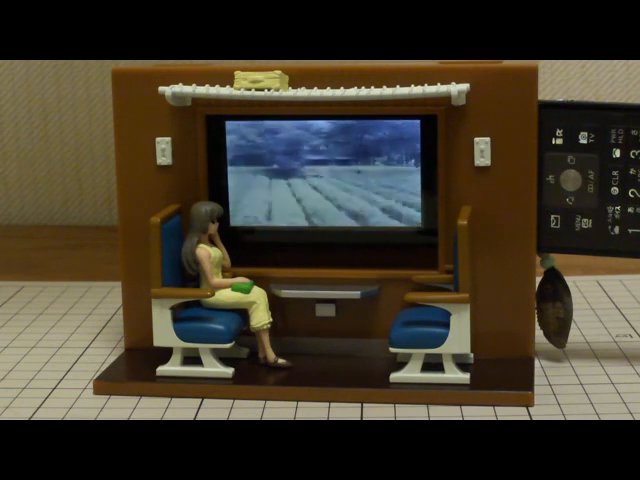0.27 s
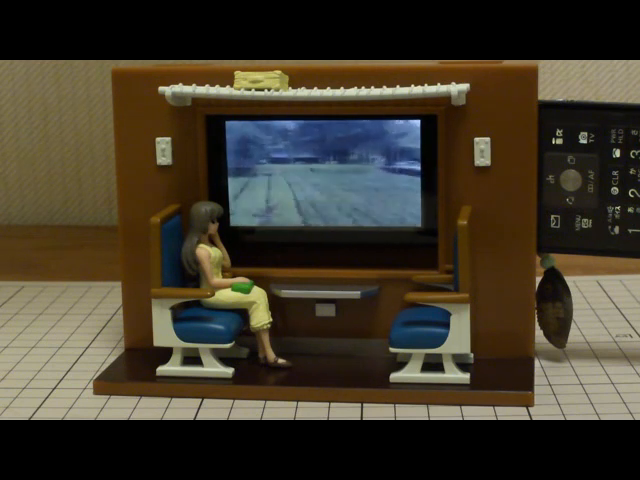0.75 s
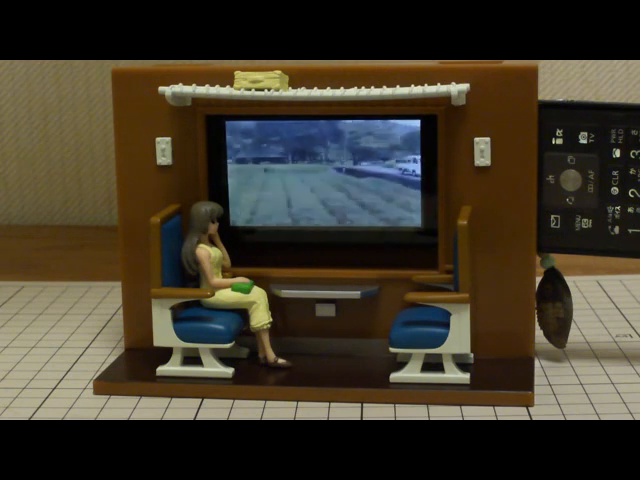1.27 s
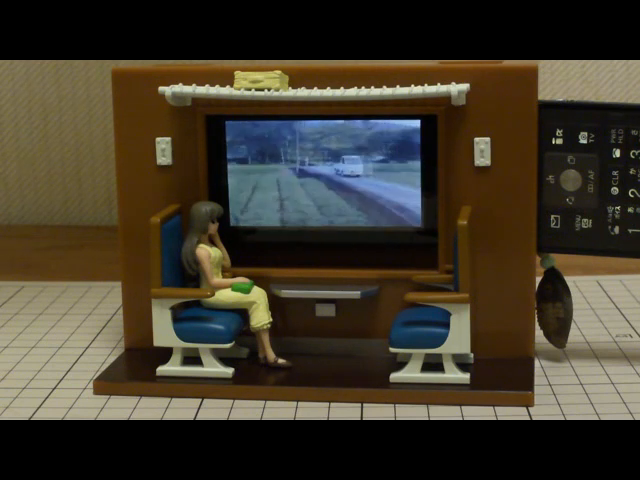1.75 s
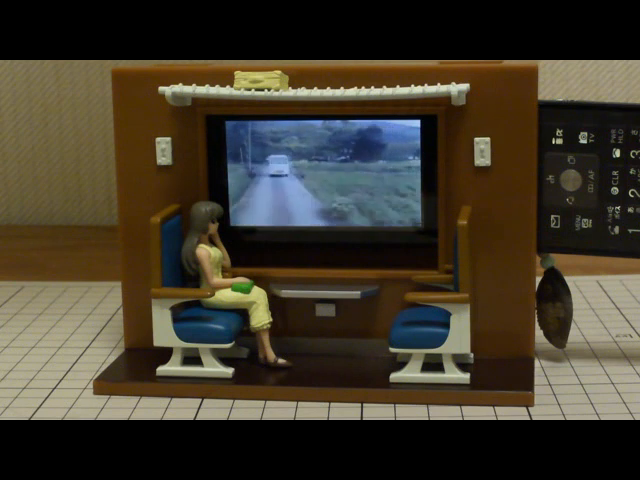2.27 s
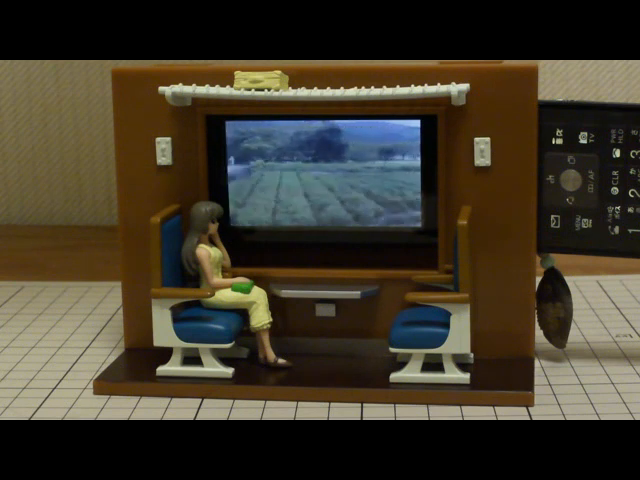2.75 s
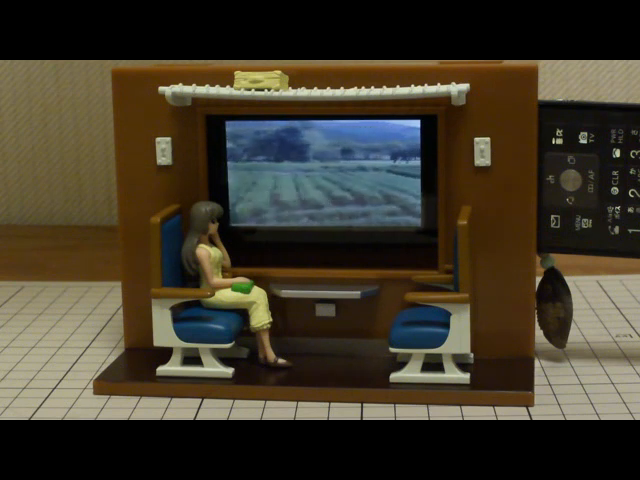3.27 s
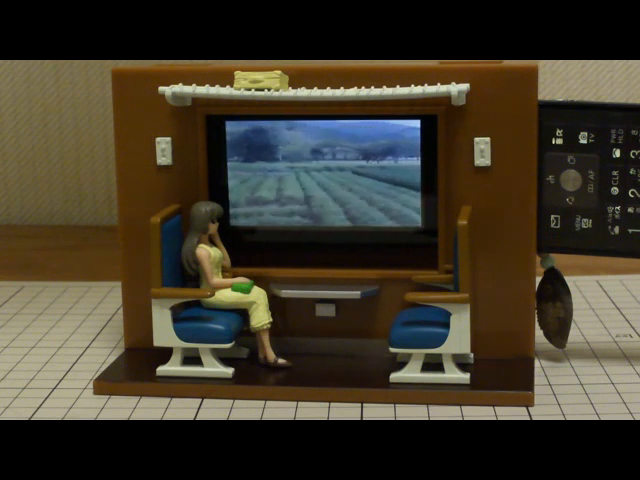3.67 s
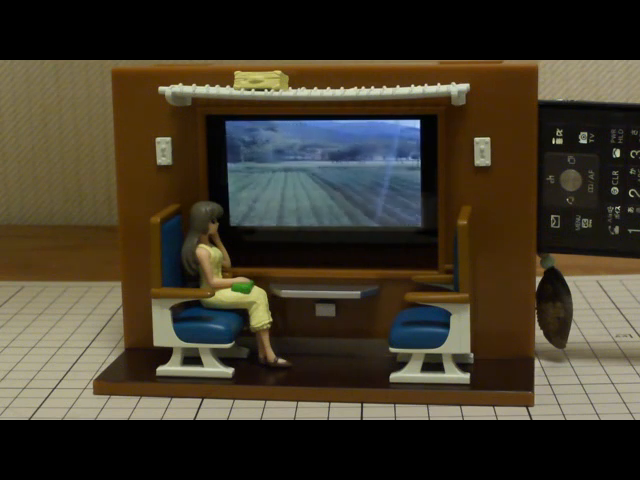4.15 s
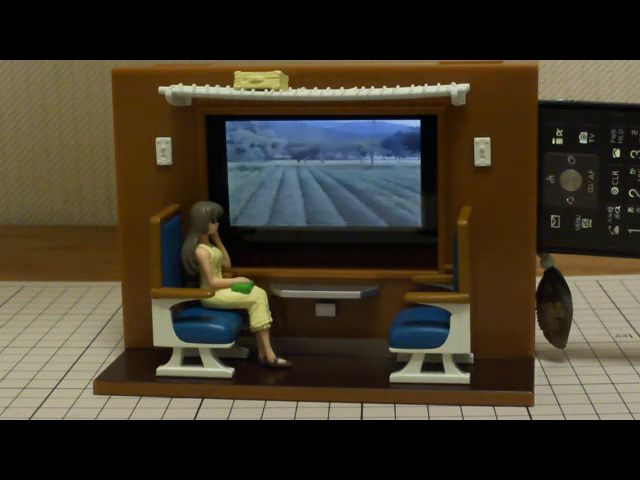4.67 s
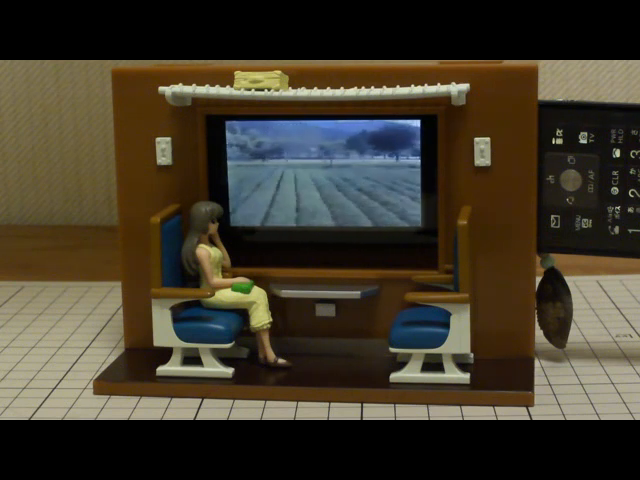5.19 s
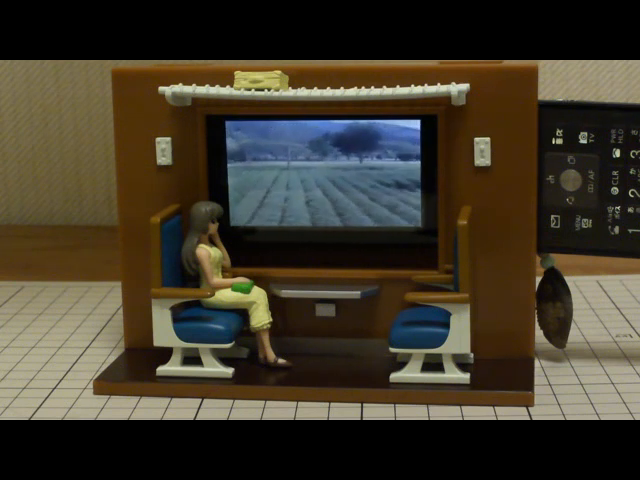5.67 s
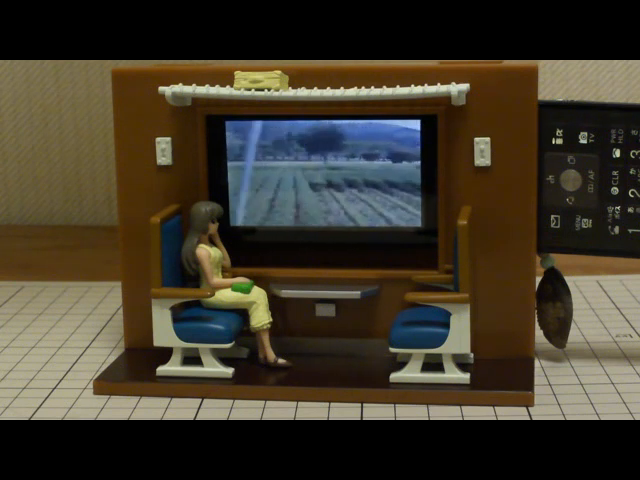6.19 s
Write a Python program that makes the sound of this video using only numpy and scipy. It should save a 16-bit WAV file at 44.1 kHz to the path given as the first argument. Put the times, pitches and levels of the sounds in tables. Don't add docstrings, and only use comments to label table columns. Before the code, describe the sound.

Train wheels clatter over rail joints, small and boxy, midrange-heavy with little bass, from a toy carriage on a table in a small room. Three irregular bursts of clacks with brief metallic rattles are separated by light ticks and rolling noise. A soft fan hum, microphone hiss and a barely audible high whine continue throughout.

```python
import sys
import numpy as np
from scipy import signal
from scipy.fft import rfft, irfft, next_fast_len
from scipy.io import wavfile
from scipy.ndimage import uniform_filter1d, map_coordinates

SR = 44100
rng = np.random.default_rng(int(sys.argv[2]) if len(sys.argv) > 2 else 0)


def to_wav(sig):
    pcm = np.clip(np.atleast_2d(sig), -1, 1) * 32767
    pcm = np.round(pcm).astype(np.int16)
    wavfile.write(sys.argv[1], SR, pcm.T)


def volts_from_db(level):
    exponent = np.asarray(level, float) / 20
    return 10 ** exponent


N = 283122


def unit(x):
    return x / np.sqrt(np.mean(x ** 2) + 1e-20)


def along(points, hz):
    f, value = np.transpose(points)
    return np.interp(np.log(hz + 1), np.log(f + 1), value)


def wobble(rate):
    knots = rng.standard_normal(int(N * rate / SR) + 4)
    return map_coordinates(knots, [np.arange(N) * rate / SR])


def filtered(x, response):
    m = next_fast_len(N + SR // 2)
    return irfft(rfft(x, m) * response(np.fft.rfftfreq(m, 1 / SR)), m)[..., :N]


def causal(gain):
    cepstrum = irfft(np.log(gain + 1e-6))
    half = len(cepstrum) // 2
    cepstrum[1:half] *= 2
    cepstrum[half + 1:] = 0
    return np.exp(rfft(cepstrum))


# t/s, peak level/dB, thud over peak level/dB, floor mode f/Hz, wheel mode f/Hz
AXLES = [(0.57, -26, -17.5, 1084, 1770), (0.733, -22.5, -7, 984, 1737), (0.853, -22.5, -15, 930, 2123),
         (1.034, -22.5, -6, 1067, 1960), (1.242, -30.5, -4.5, 1193, 1880), (1.617, -29, -14.5, 1070, 1670),
         (1.763, -27.5, -11, 980, 1841), (2.6, -28.5, -14, 954, 1754), (2.76, -23, -8.5, 1057, 1751),
         (2.934, -28, -11.5, 1029, 1670), (3.06, -23, -7, 907, 1796), (3.258, -30.5, -9.5, 930, 1577),
         (4.049, -35.5, -3.5, 1053, 1810), (4.602, -34, -6, 954, 1884), (4.764, -26, -5.5, 1031, 1740),
         (5.043, -22, -12, 998, 1837), (5.054, -22.5, -11.5, 954, 1845), (5.084, -28.5, -2.5, 1220, 1960),
         (5.249, -30.5, -5.5, 965, 1706), (5.284, -41.5, 5.5, 1046, 2000), (5.317, -25, -7, 997, 1735),
         (5.352, -43, -2, 980, 1785)]
# t/s, peak level/dB, mode f/Hz
FAR_AXLES = [(0.145, -34.5, 1770), (0.389, -35, 1866), (0.453, -42, 1810), (0.555, -30, 1800),
             (0.589, -35, 1020), (1.182, -34, 1803), (1.365, -46, 1000), (1.453, -39.5, 1800),
             (1.645, -32, 942), (2.049, -40, 1770), (2.182, -35, 1758), (2.39, -38.5, 1830),
             (2.628, -30.5, 1750), (2.668, -34.5, 1824), (2.783, -45, 1070), (3.089, -40, 970),
             (3.114, -33, 1960), (3.508, -42.5, 956), (3.682, -44.5, 1040), (3.798, -36, 1780),
             (3.857, -33.5, 1853), (4.175, -36, 1750), (4.989, -43, 975), (5.11, -37.5, 1220),
             (5.621, -36.5, 1880), (5.675, -50, 1020), (6.172, -37.5, 1733)]
# t/s, peak level/dB, mode f/Hz, fizz over peak level/dB
LOOSE_STEEL = [(.735, -58, 6330, -3), (3.063, -54, 6900, 0), (.56, -56.5, 3340, -8), (0.852, -56, 2850, -5),
               (.855, -46.5, 3410, 0), (0.876, -60, 3300, 5), (1.04, -54, 6560, 0), (1.619, -50.5, 2710, 2),
               (2.057, -55.5, 2704, -7), (2.76, -49.5, 2880, 1), (2.935, -57.5, 5770, -3),
               (3.691, -56, 3070, -12), (3.869, -60, 2830, -3), (4.763, -54.5, 6150, 1),
               (2.94, -57, 6800, -3), (5.044, -48.5, 3420, -2), (5.09, -57, 6400, -4),
               (5.126, -58, 7000, -7)]


def blows():
    strong = [(s, db, [db + thud_db, db, db - 50, db - 43], 0.42) for s, db, thud_db, *_ in AXLES]
    light = []
    for s, db, hz in FAR_AXLES:
        thud_db = -3 if hz < 1400 else -12
        light.append((s, db, [db + thud_db, db, db - 43.5, db - 44.5], 0.61))
    loose = [(s, -25, [db, db, db + fizz_db, db - 8], 0.22) for s, db, _, fizz_db in LOOSE_STEEL]
    lead = [(s - .011, db, np.add(levels_db, -16), .1) for s, db, levels_db, _ in strong]
    return strong + light + loose + lead


def joints():
    bands, t = np.zeros((4, N + SR)), np.arange(SR // 3) / SR
    longer = np.array([[1.01], [1.01], [1.2], [1.4]])
    rise_s = np.array([[.0025], [.0025], [.005], [.008]])
    crack = volts_from_db(-60 * t / 0.091) * np.array([[1.6], [1.6], [.6], [.2]])
    band_db = np.array([[8.5], [0], [46], [41.5]]) - 11
    for s, db, levels_db, t60 in blows():
        knots = rng.standard_normal((4, 64))
        lumps = np.array([np.interp(t * 120, np.arange(64), k) for k in knots])
        rattle = volts_from_db(-1.5 - 60 * t / (max(t60, .03) * longer) + 1.7 * lumps)
        rise = volts_from_db(-.3 * (db + 30)) * rise_s
        shape = (crack + rattle) * (1 - np.exp(-t / rise))
        gains = volts_from_db(np.array(levels_db)[:, None] + band_db)
        start = round((s - .002) * SR)
        bands[:, start:start + len(t)] += gains * shape * rng.standard_normal((4, len(t)))

    def split(hz):
        edges_hz = np.array([[300], [1424], [3340], [3006], [7370]])
        return np.diff(1 / (1 + (hz / edges_hz) ** 8), axis=0)

    return filtered(bands[:, :N], split).sum(0)


def modes():
    floor = [(s, db + thud_db + 4, hz, 0.32) for s, db, thud_db, hz, _ in AXLES]
    wheel = [(s, db + 1.5, hz, .115) for s, db, *_, hz in AXLES]
    light = [(s, db + 2.5, hz, 0.12) for s, db, hz in FAR_AXLES]
    loose = [(s, db, hz, 0.34) for s, db, hz, _ in LOOSE_STEEL]
    below = [(s, db - 12, hz * .86, t60) for s, db, hz, t60 in floor + wheel]
    return floor + wheel + below + light + loose


def rings():
    out, t = np.zeros(N + SR), np.arange(SR // 3) / SR
    for s, db, hz, t60 in modes():
        drift = uniform_filter1d(np.cumsum(rng.standard_normal(len(t))), size=80) * 0.043
        decay = volts_from_db(db - 9.5 - 60 * t / max(t60, .02))
        onset = 1 - np.exp(-(t / 0.0013) ** 2)
        start = round((s - .001) * SR)
        out[start:start + len(t)] += decay * onset * np.sin(2 * np.pi * hz * t + drift)
    return filtered(out[:N], lambda hz: (hz > 500) & (hz < 7300))


# t/s, level/dB
ROAR = [(0.0, -48), (1.0, -48), (1.7, -48.5), (2.2, -47.5), (3.0, -49), (3.6, -49), (4.6, -48.5),
        (5.4, -48), (6.42, -49)]


def rolling():
    s, db = np.transpose(ROAR)
    lumps = volts_from_db(.8 * wobble(9) + 1.4 * wobble(45))
    level = volts_from_db(np.interp(np.arange(N) / SR, s, db) - 0.5)
    return level * unit(lumps * rng.standard_normal(N))


# f/Hz, level/dB
CONE_AND_BOX = [(240, -69), (400, -25), (759, -11), (1060, -2), (1230, -6), (1390, -11), (1820, -1.5),
                (2030, -3.5), (2190, -9.5), (2770, -23.5), (2980, -33.5), (3290, -31.5), (3960, -40),
                (6890, -29), (7600, -34.5), (9880, -66), (16700, -120)]
# f/Hz, width/Hz, level/dB
BOX_PANELS = [(749, 11, 9), (899, 21, 9), (985, 8.9, 4.5), (1017, 24, 3), (1220, 20, 5.5), (1670, 28, -9),
              (1678, 45, 8), (1754, 15, 10), (1870, 8.2, 6.5), (1960, 56, 0), (1970, 34, 4)]


def loudspeaker(x):
    def gain(hz):
        panels_db = sum(db / (1 + (2 * (hz - c) / width) ** 2) for c, width, db in BOX_PANELS)
        return volts_from_db(along(CONE_AND_BOX, hz) + panels_db)

    return volts_from_db(12) * filtered(x, lambda hz: causal(gain(hz)))


# f/Hz, t60/s
ROOM_DECAY = [(500, 0.15), (2000, 0.22), (7000, 0.16)]


def room(x):
    hz, t, z = signal.stft(rng.standard_normal((2, SR // 2)), SR, nperseg=256)
    decay = volts_from_db(-60 * t / along(ROOM_DECAY, hz)[:, None])
    tail = signal.istft(z * decay, SR, nperseg=256)[1]
    tail = tail / np.linalg.norm(tail[0])
    delayed = np.pad(x, (100, 0))[None]
    return signal.fftconvolve(delayed, tail, axes=1)[:, :N]


# f/Hz, level/dB
FAN_AIR = [(20, -24), (50, -35), (70, -23.5), (100, -12.5), (125, -9.5), (200, -6.5), (280, -1.5),
           (400, -4.5), (600, -2), (900, -4), (1500, -45.5)]
# f/Hz, correlation
FAN_LIKENESS = [(25, .1), (45, .3), (70, 1), (125, 0.16), (250, 0.49), (600, 0.28)]
# f/Hz, rms level/dB, wander/Hz
MOTOR_TONES = [(438.8, -56, 0.53), (277.3, -67, 2.92), (297.2, -70, 4.08), (472.8, -66.5, 3.7),
               (120.7, -80.5, 0.63)]


def fan():
    def mid_side(hz):
        angle = np.arccos(np.clip(along(FAN_LIKENESS, hz), -1, 1)) / 2
        return volts_from_db(along(FAN_AIR, hz)) * [np.cos(angle), np.sin(angle)]

    mid, side = filtered(rng.standard_normal((2, N)), mid_side)
    out = volts_from_db(-55.5) * unit(np.array([mid + side, mid - side]))
    lead = np.array([[.45], [-.45]])
    for hz, db, wander_hz in MOTOR_TONES:
        level = np.sqrt(2) * volts_from_db(db + 0.2 * wobble(8))
        phase = 2 * np.pi * np.cumsum(hz + wander_hz * wobble(6)) / SR
        out = out + level * np.sin(phase + lead)
    return out


# f/Hz, level/dB
CAMERA_HISS = [(300, -39), (2500, -19), (3400, -14), (4500, -12), (5700, -2.5), (7000, -3.5), (7870, -2.5),
               (10000, -8), (10900, -15.5), (11400, -37), (12000, -50), (13800, -54), (14400, -25),
               (15690, -14), (15730, -72)]


def hiss():
    t = np.arange(N) / SR
    buzz = 1 + 0.084 * sum(np.cos(2 * np.pi * 59.9 * k * t) for k in (1, 2, 3, 4))
    noise = filtered(rng.standard_normal((2, N)), lambda hz: volts_from_db(along(CAMERA_HISS, hz)))
    return volts_from_db([[-67.3], [-67.7]]) * buzz * unit(noise)


# f/Hz, rms level/dB
CAMERA_WHINE = [(7854, -80), (7881, -85), (9110, -100), (14998, -101)]


def whine():
    t = np.arange(N) / SR
    tone = lambda hz: np.sin(2 * np.pi * hz * t + [[.7], [-.7]])
    return sum(np.sqrt(2) * volts_from_db(db + 2.3 * wobble(14)) * tone(hz) for hz, db in CAMERA_WHINE)


# f/Hz, width/Hz
MOTOR_NOTCHES = [(3000, 140), (4000, 195), (5000, 296)]


def notched(x):
    def response(f):
        gaps = [(c * c - f * f) / (c * c - f * f + 1j * f * w) for c, w in MOTOR_NOTCHES]
        return np.prod(gaps, 0) ** 2

    return filtered(x, response)


def scene():
    train = loudspeaker(joints() + rolling()) + rings()
    return (train + volts_from_db(-8) * room(train) + fan()) * volts_from_db([[.35], [-.35]])


def roll_off(x):
    return signal.sosfilt(signal.butter(12, 15700, fs=SR, output="sos"), x)


def record(dry):
    return roll_off(notched(dry + hiss() + whine()))


dry = scene()
out = record(dry)
to_wav(out)
```